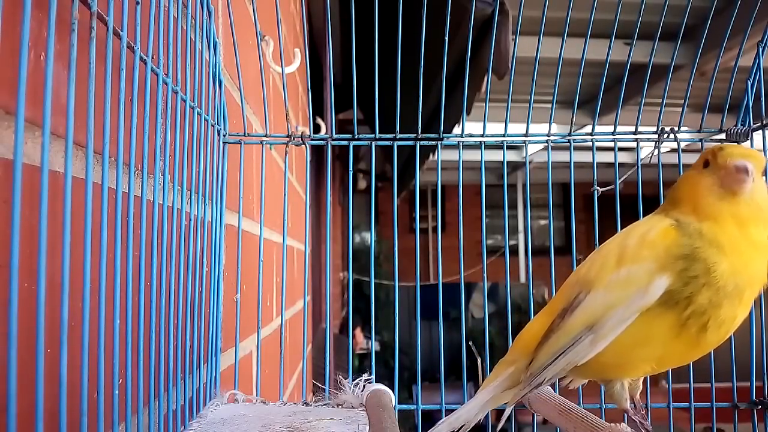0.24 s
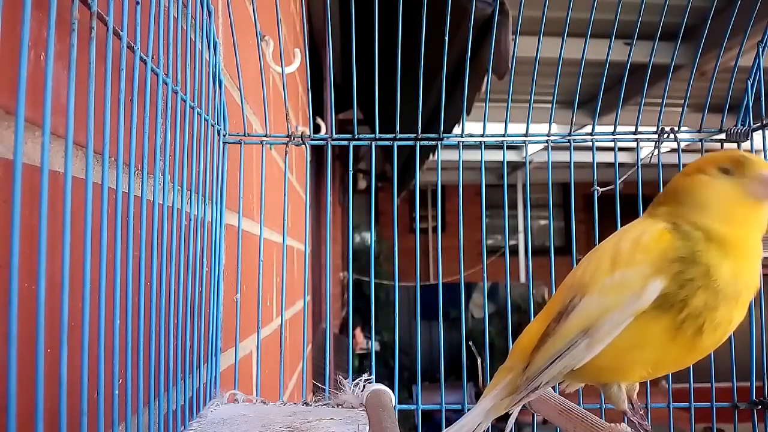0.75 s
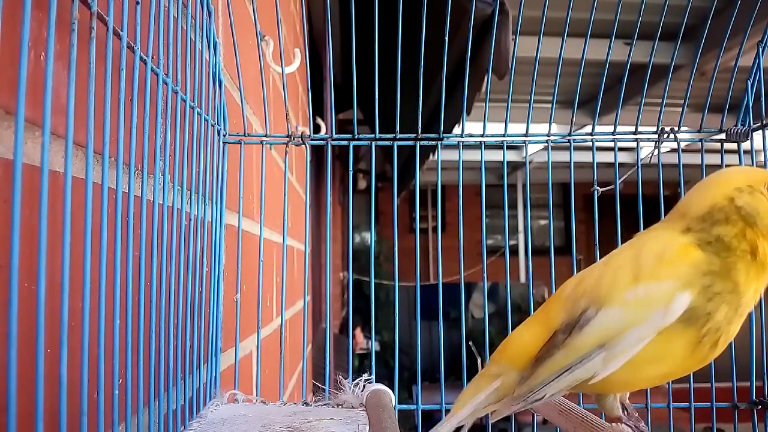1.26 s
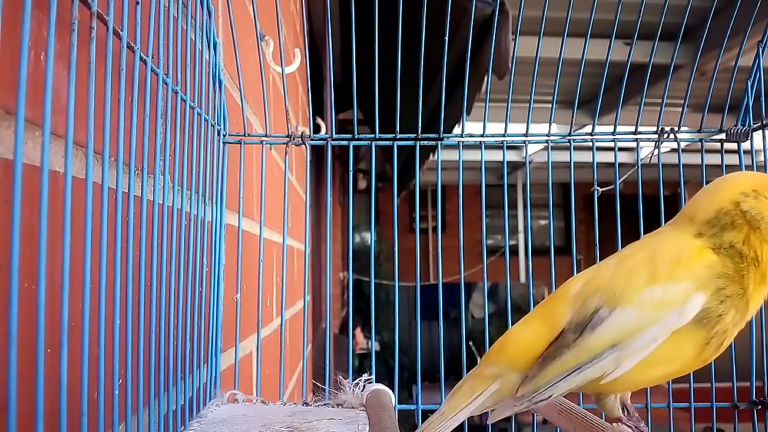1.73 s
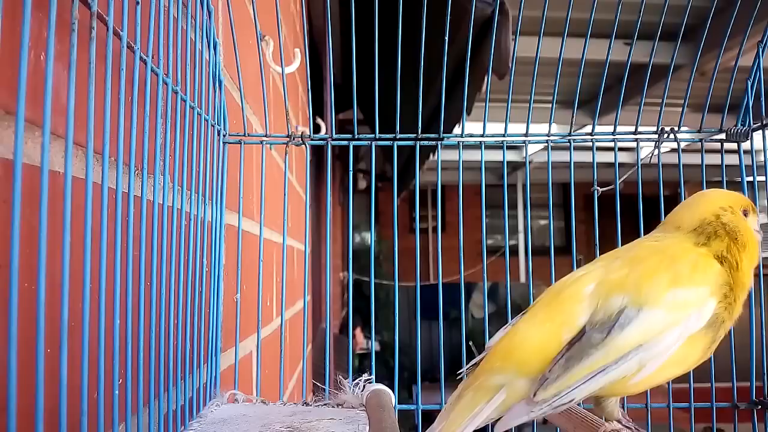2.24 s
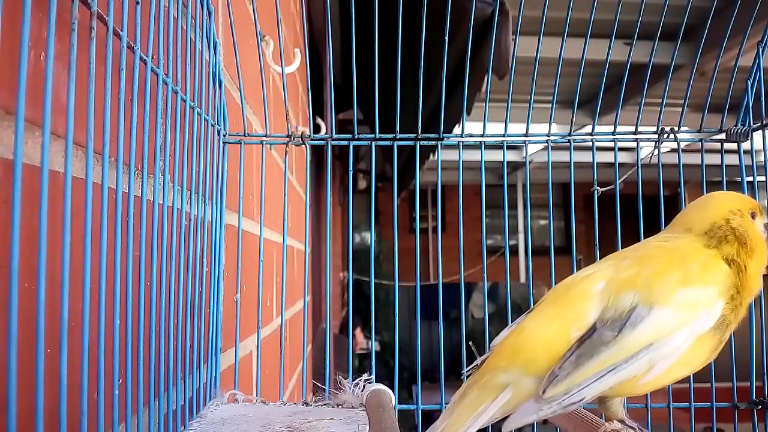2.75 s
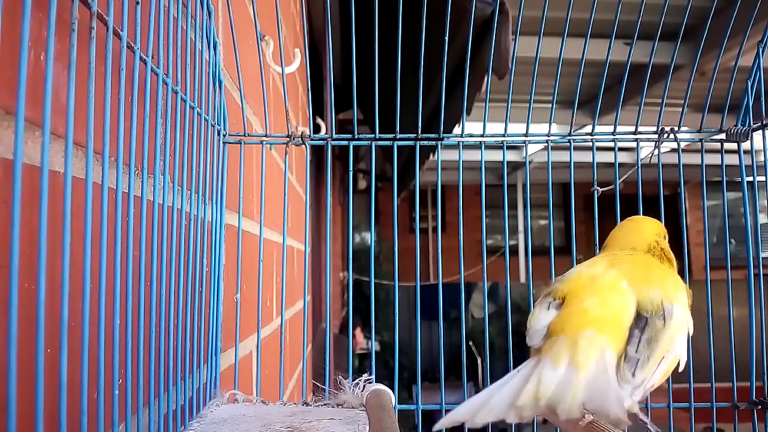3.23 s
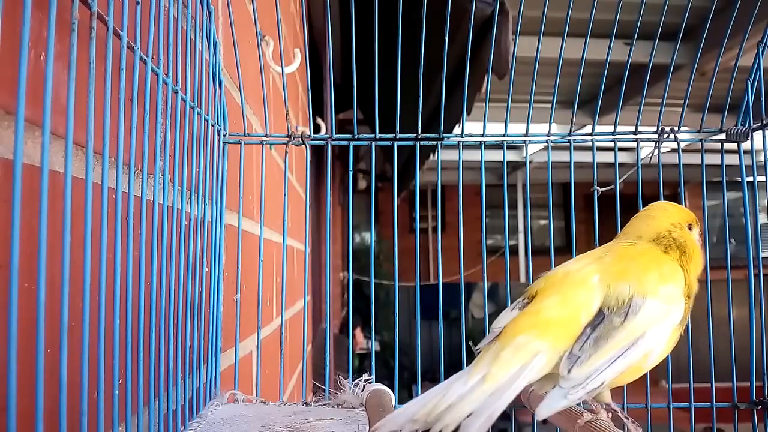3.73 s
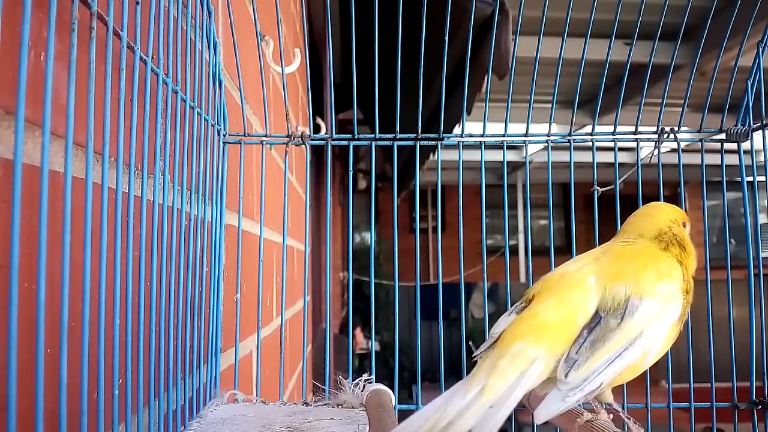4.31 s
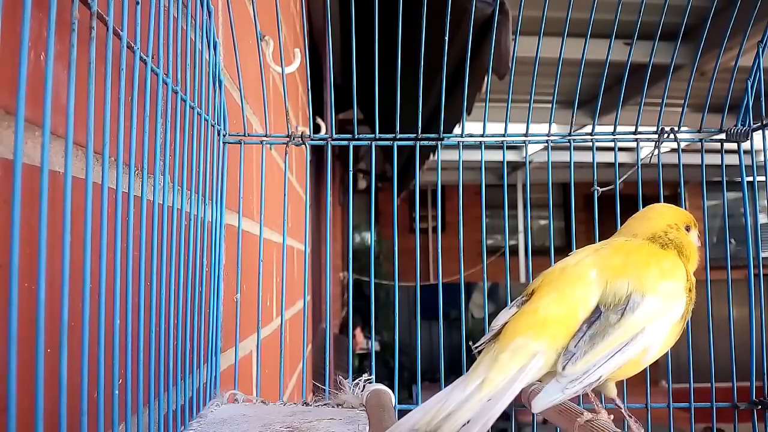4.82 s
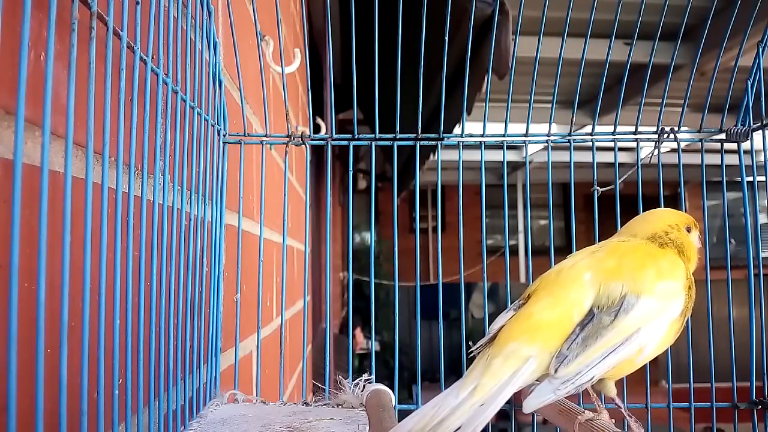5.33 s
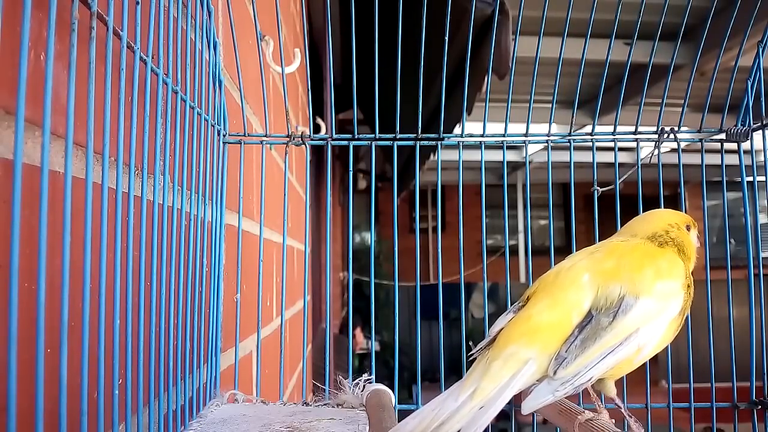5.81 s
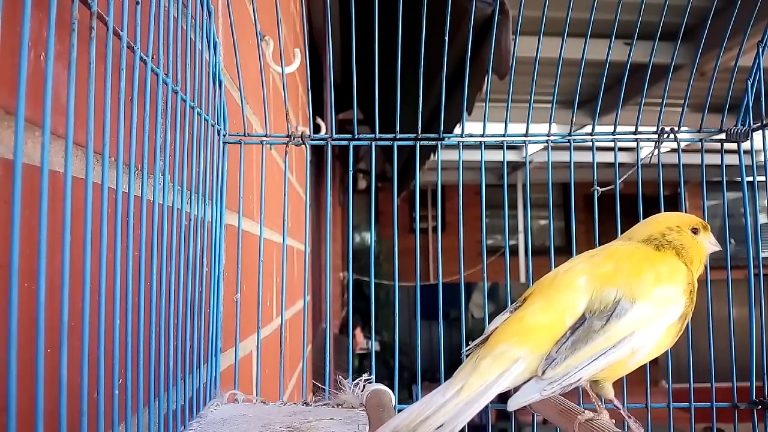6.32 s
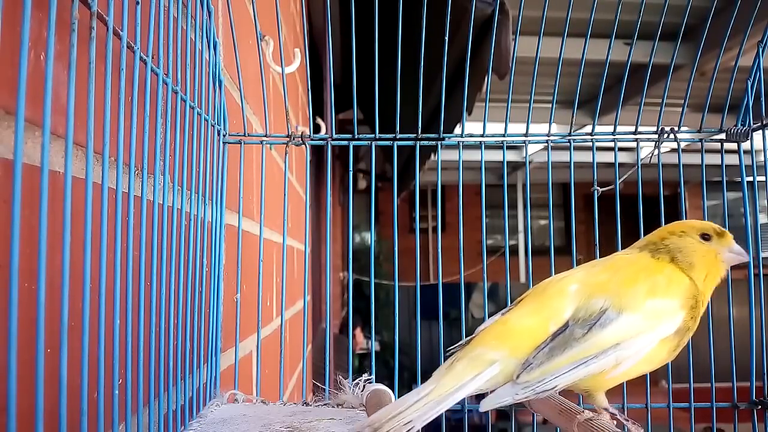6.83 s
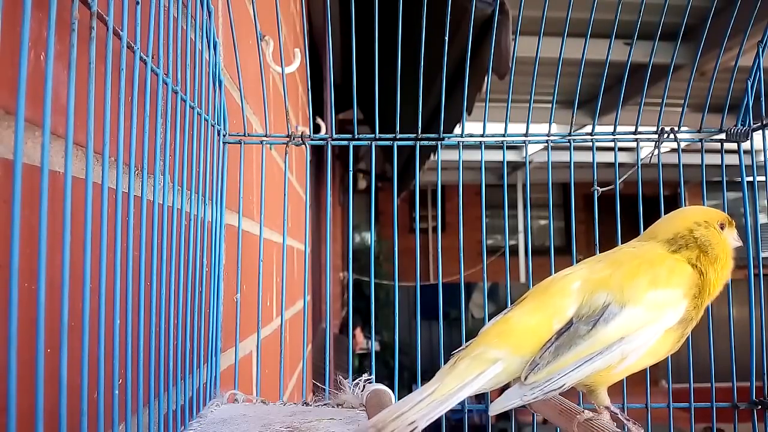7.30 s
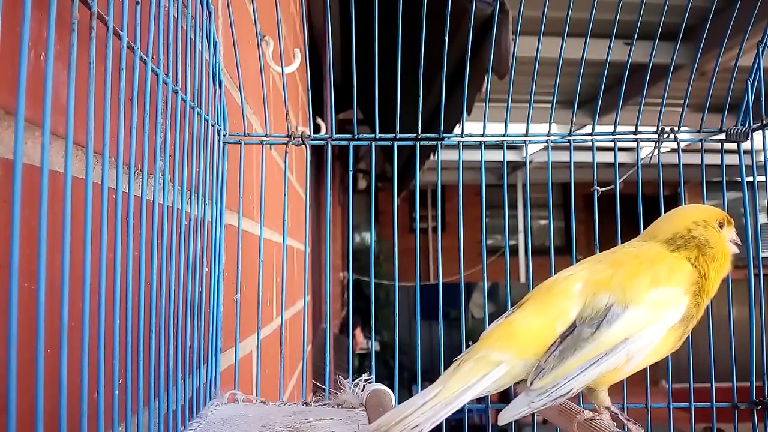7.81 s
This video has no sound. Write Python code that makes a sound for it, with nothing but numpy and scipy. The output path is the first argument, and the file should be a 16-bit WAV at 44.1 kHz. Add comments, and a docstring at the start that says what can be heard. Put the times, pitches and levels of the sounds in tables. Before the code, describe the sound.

Pure, high bird whistles in a reverberant hard-walled space: first distant rising slurs and soft falling notes, then closer upward sweeps with quick flicks overlapping them. A buzzing-fast trill of tiny rising chirps follows, gradually slower and fuller. After it stops, distant metal knocks clatter and ring over faint airy noise. A chip and two sweeping whistles restart the song near the end.

```python
"""In a live, hard-walled room, two canaries sing over a soft rush, a low rumble and a hiss, all made of noise.
The far bird gives rising slurs with two flicks, one falling drop, then a run of falling sighs.
The near bird cuts in with chips, upward sweeps with quick flicks, and a fast trill that slows and swells.
Each bird note is a gliding, nearly pure tone with weak overtones. Metal clanks some way off, mostly in
the pause after the trill: bursts of noise and fading rings. Then the near bird starts again."""
import sys
import numpy as np
from scipy import signal
from scipy.fft import rfft, irfft, next_fast_len
from scipy.io import wavfile
from scipy.ndimage import uniform_filter1d

SR = 44100
rng = np.random.default_rng(int(sys.argv[2]) if len(sys.argv) > 2 else 0)


def pcm_store(signal):
    """Save signal as 16-bit PCM."""
    levels = np.round(np.clip(np.atleast_2d(signal), -1, 1) * 32767)
    wavfile.write(sys.argv[1], SR, levels.astype(np.int16).T)


N = 355137

# Colour of the background rush: (frequency [Hz], relative level [dB])
RUSH_COLOUR = [(20, -34), (55, -20), (100, -10), (200, -8.5), (430, -9.5), (650, 0.5), (900, 6),
               (1300, -1.5), (2500, -10), (4000, -11.5), (6000, -8), (7200, -20.5), (8500, -36.5),
               (15000, -42.5)]
# Loudness of the rush: (time [s], level [dB])
RUSH_LEVEL = [(0, -53.5), (1.2, -55.5), (2.4, -56.5), (3, -54), (3.6, -57), (4.8, -56.5), (5.55, -60),
              (6.3, -58), (7.2, -58.5), (8.05, -61.5)]
# Colour of the low rumble: (frequency [Hz], relative level [dB])
RUMBLE_COLOUR = [(25, -34), (60, -22), (100, -5.5), (170, -3), (330, -1.5), (600, -7), (1200, -44)]
# Loudness of the rumble, before its unevenness: (time [s], level [dB])
RUMBLE_LEVEL = [(0, -64.5), (1.0, -66.5), (1.7, -68.5), (1.95, -60), (2.4, -70.5), (2.9, -64), (4.0, -73),
                (5.5, -73), (7, -72.5), (8.05, -69)]
# Colour of the hiss: (frequency [Hz], relative level [dB])
HISS_COLOUR = [(600, -24), (1500, 1), (3000, 8), (6000, 7.5), (7500, -7.5), (9500, -22.5), (15000, -41.5)]
# Loudness of the hiss: (time [s], level [dB])
HISS_LEVEL = [(0, -48), (1, -53), (1.4, -54), (2.8, -52), (3.5, -54), (4.7, -67), (8.05, -68.5)]

# Knocks on metal, before the gains in clanks(); the ring level also sets the scrape:
# (time [s], clatter level [dB], ring level [dB])
KNOCKS = [(0.933, -52, -72), (2.546, -52.5, -69), (2.82, -45, -79.5), (4.967, -44, -39), (5.145, -49, -46),
          (5.702, -45, -64), (5.848, -48.5, -63), (5.958, -55, -79), (6.67, -57, -72), (6.722, -43, -47),
          (7.364, -45, -46.5), (7.812, -46, -54)]
# The metal's ringing tones: (frequency [Hz], relative level [dB], time to fade by 60 dB [s])
METAL_MODES = [(1728, -12, 0.46), (1900, -18, .4), (4215, 2.5, .33), (4250, 8, .12), (4400, -3, .27),
               (6600, -15.5, .34), (7799, -3.5, .26), (7790, -7.5, .49), (9496, -10, .19)]
# Colour of the clatter: (frequency [Hz], relative level [dB])
CLATTER_COLOUR = [(30, -43), (100, -18.5), (400, -11), (600, -1.5), (1000, -2), (1350, -6.5), (1900, 2),
                  (2700, -12.5), (4300, -10), (6500, -20.5), (9000, -45.5), (15000, -64.5)]
# Colour of the bright scrape of metal on metal: (frequency [Hz], relative level [dB])
SCRAPE_COLOUR = [(100, -47), (800, -21.5), (2500, -5.5), (4400, -0.5), (6200, -1.5), (8000, -17.5),
                 (9000, -24.5), (11000, -31.5), (15000, -49.5)]
# Light clinks of thin metal: (time [s], frequency [Hz], level [dB])
THIN_CLINKS = [(0.247, 6090, -31), (1.464, 6130, -39)]

# Nearest walls and roof: (echo delay [s], level [dB])
WALL_ECHOES = [(.0053, -19), (.0076, -23), (0.0116, -21.5), (0.0121, -24), (0.0185, -33.5), (.022, -32.5),
               (.031, -27.5)]
# How long the room rings on: (frequency [Hz], time to fade by 60 dB [s])
ROOM_FADE = [(300, 1), (1000, 0.58), (2500, 0.67), (4200, 0.51), (8000, 0.41), (15000, 0.64)]

# Shape of each kind of note: (share of its length [0 to 1], factor on the note's pitch, change of level [dB])
NOTE_SHAPES = { "sweep": [(0, .53, -30), (.08, .6, -11), (.17, .7, -7.5), (.28, .805, -8.5),
               (.45, .88, -8.5), (.6, .925, -4.5), (.76, .965, -1.5), (.9, .995, .5), (1, 1, -9.5)],
               "slur": [(0, .6, -24), (.12, .66, -17), (.22, .79, -6), (.34, .855, -2.5), (.5, .9, -6),
               (.66, .955, -4.5), (.82, 0.97, -.5), (1, 1.02, -5)], "flick": [(0, .855, -8),
               (.15, .89, -0.5), (.33, .915, 0), (.6, .98, -4.5), (.8, 1.015, -5), (1, 1.033, -15)],
               "rise": [(0, 0.49, -16), (.2, .78, -2), (.45, .87, -2.5), (.7, .94, -3), (1, 1.02, -8.5)],
               "sigh": [(0, 1.02, -15.5), (.17, .985, 3), (.4, .94, -2), (.65, .875, -4.5), (.85, .79, -3),
               (1, .72, -10)], "drop": [(0, 1, -13), (.28, .975, -6), (.55, .94, -6), (.71, .89, 2),
               (.86, .76, -1), (1, .6, -10)], "chip": [(0, 1.01, -26), (.14, 0.95, -9), (.35, 0.94, -11),
               (.5, .88, -5), (.63, .77, 1.5), (.8, 0.61, -17.5), (1, 0.61, -19)],
               "short chirp": [(0, .27, -24.5), (.12, .34, -26), (.24, .45, -30), (.4, .6, -9),
               (.56, .76, -8), (.68, .89, 0.5), (.78, .94, 2.5), (.88, .985, -3.5), (1, 1.06, -15)],
               "long chirp": [(0, .29, -26.5), (.13, .39, -30), (.22, .55, -20), (.32, .7, -5),
               (.43, .81, -6.5), (.53, .885, -2.5), (.72, .96, 1.5), (.88, .995, -4), (1, 1.03, -19)], }
# Overtones of a loud note: (multiple of the pitch, level under the main tone [dB])
OVERTONE_LEVELS = [(2, -39), (3, -51), (4, -57)]
# The throat lets overtones through unevenly: (frequency [Hz], change of level [dB])
THROAT_COLOUR = [(2500, -3.5), (6000, 8), (7000, 4.5), (7700, -6.5), (8500, -6), (9500, 0.5), (10400, -6),
                 (11400, -1), (12200, -14), (13200, -12), (14200, -1)]

# Far syllables, a glide and two flicks: (time of first flick [s], glide length [s], pitch [Hz], level [dB])
FAR_GLIDES = [(.023, 0.1, 3970, -20), (.366, 0.11, 4100, -17), (.725, .116, 4090, -15.5)]
# Their flicks: (time after the first [s], length [s], factor on the glide's pitch, level over the glide [dB])
FAR_FLICK_PAIR = [(0, .028, 1.21, 2.5), (.063, .019, 1.14, 3)]
# The far bird's falling sighs: (time [s], length [s], level [dB])
FAR_SIGHS = [(1.402, 0.076, -18.5), (1.565, 0.077, -17), (1.729, 0.076, -15.5), (1.897, 0.069, -14),
             (2.06, .064, -15), (2.214, .057, -13), (2.371, .052, -13.5), (2.523, 0.059, -12.5),
             (2.666, .064, -13.5)]
# Colour of the lisp before a sigh: (frequency [Hz], relative level [dB])
LISP_COLOUR = [(2500, -44.5), (4300, 1.5), (5700, -1.5), (6500, -24.5), (9000, -58.5)]
# Near syllables: (time of flick [s], glide length [s], pitch [Hz], level [dB],
# straight path [dB], flick over the glide [dB], pitch of closing rise [Hz])
NEAR_GLIDES = [(1.989, 0.09, 4120, -19, 0.5, 5.5, 5250), (2.359, .103, 4170, -16.5, 2, 4, 5150),
               (2.766, .103, 4150, -16.5, 2.5, 4, 5160), (7.615, .101, 4110, -18.5, 3, 7, 4870),
               (7.979, .111, 4080, -19, 4, 6, 4940)]
# A sharp chip before each near phrase: (time [s], length [s], pitch [Hz], level [dB], straight path [dB])
NEAR_CHIPS = [(1.673, .0226, 5550, -18.5, 0.5), (7.287, 0.027, 5270, -15, 2.5)]
# The trill slows overall: (time [s], time from one chirp to the next [s])
TRILL_BEAT = [(2.82, .03868), (2.95, .03829), (3.2, .03983), (3.7, .0397), (3.95, .04184), (4.05, .04168),
              (4.6, .0459)]
# Its chirps grow longer, lower and louder overall, before a little chance:
# (time [s], length [s], pitch [Hz], level [dB])
TRILL_CHIRPS = [(2.82, 0.016, 4490, -19), (2.97, 0.016, 4390, -14.5), (3.22, .017, 4410, -14.5),
                (3.38, 0.017, 4430, -16.5), (3.6, .018, 4390, -14), (3.9, 0.021, 4325, -12),
                (4.28, .023, 4186, -13), (4.58, 0.023, 4165, -13.5), (4.625, .026, 4060, -17)]

LEAD_S = .2  # room for a song already under way at time zero
FAR_OVERTONES_DB, NEAR_OVERTONES_DB = 0, -2.5
FAR_GAP_S, FAR_STRAIGHT_DB, FAR_FLICK_STRAIGHT_DB = .02, -12, -9
DROP_AT_S, DROP_S, DROP_HZ, DROP_DB = 1.091, .084, 4400, -17.5
SIGH_HZ, SIGH_STRAIGHT_DB = 3490, -9.5
LISP_LEAD_S, LISP_DB = .044, -36
NEAR_GAP_S = .021
FLICK_S, FLICK_RATIO, FLICK_STRAIGHT_DB = .023, 1.252, -4  # the flick jumps up and spreads more widely
RISE_AFTER_S, RISE_S, RISE_DB = .0575, .0235, 1  # the closing rise, timed from the flick
TRILL_START_S, TRILL_END_S = 2.8213, 4.64
CHIRP_PEAK = .69  # share of a chirp that comes before its beat
EDGE_HZ = 15700  # upper edge of the whole sound


def amp(db):
    """Turns decibels into a gain."""
    return 10 ** (np.asarray(db) / 20)


def evened(x):
    """Scales a sound to an average strength (rms) of 1."""
    return x / np.sqrt(np.mean(x ** 2) + 1e-20)


def read(points, hz):
    """Reads a table between its frequencies, spaced roughly as we hear pitch."""
    f, value = np.transpose(points)
    return np.interp(np.log(hz + 1), np.log(f + 1), value)


def curve(points):
    """Reads a table over time at every sample."""
    return np.interp(np.arange(N) / SR, *np.transpose(points))


def add(mix, s, sound):
    """Mixes a sound in at time s."""
    part = mix[round(s * SR):][:len(sound)]
    part += sound[:len(part)]


def noise(colour, size):
    """Noise of a given colour, with an rms of 1."""
    spectrum = rfft(rng.standard_normal(size))
    gain = amp(read(colour, np.fft.rfftfreq(size, 1 / SR)))
    return evened(irfft(spectrum * gain, size))


def wander(rate_hz, size):
    """Smooth random drift, mostly slower than rate_hz, with an rms of about 1."""
    span = next_fast_len(max(size, SR // 10))
    hz = np.fft.rfftfreq(span, 1 / SR)
    slow = rfft(rng.standard_normal(span)) * np.exp(-(hz / rate_hz) ** 2)
    return evened(irfft(slow, span))[:size]


def patchy(x, patchy_db=2.0):
    """Lets a steady noise swell and sink in small patches of time and frequency."""
    z = signal.stft(x, SR, nperseg=1024)[2]
    patches = uniform_filter1d(rng.standard_normal(z.shape), size=7, axis=0)
    patches = uniform_filter1d(patches, size=7, axis=1)
    return signal.istft(z * amp(patchy_db * evened(patches)), SR, nperseg=1024)[1][:N]


def background(lumps_db=1.5, lumps_hz=7):
    """A soft rush, an uneven low rumble and a hiss that dies away."""
    rush = noise(RUSH_COLOUR, N) * amp(curve(RUSH_LEVEL))
    rumble = noise(RUMBLE_COLOUR, N) * amp(curve(RUMBLE_LEVEL) + lumps_db * wander(lumps_hz, N))
    hiss = noise(HISS_COLOUR, N) * amp(curve(HISS_LEVEL))
    return patchy(rush + rumble + hiss)


def first_echoes(x):
    """Single returns from the nearest walls and the roof."""
    out = np.zeros(len(x))
    for delay, db in WALL_ECHOES:
        add(out, delay, amp(db) * x)
    return out


def room(x, build_s=0.0031):
    """Many blended echoes, of total energy 1, where each band of pitch dies at its own speed."""
    hz, t, z = signal.stft(rng.standard_normal(SR), SR, nperseg=256)
    fade = amp(-60 * t / read(ROOM_FADE, hz)[:, None])
    tail = signal.istft(z * fade, SR, nperseg=256)[1]
    tail *= 1 - np.exp(-(np.arange(len(tail)) / SR / build_s) ** 2)
    return signal.fftconvolve(x, tail / np.linalg.norm(tail))[:len(x)]


def near_surface(x, dip_hz, width_hz, depth):
    """A surface close by weakens one narrow band of the straight sound; glides blink as they cross it."""
    notched = signal.lfilter(*signal.iirnotch(dip_hz, dip_hz / width_hz, SR), x)
    return x + np.clip(depth, 0, 1) * (notched - x)


def clanks(clatter_t60=0.13, scrape_t60=0.32, clink_t60=0.35, settle_s=0.006, clatter_gain_db=12.0,
           scrape_gain_db=6, spread_hz=60, steady=.7, beating=.6, rattle_db=3, rattle_hz=45):
    """Each knock is a brief, rattling clatter and a scrape that set the metal's modes ringing."""
    out, t = np.zeros(N), np.arange(SR) / SR
    attack = 1 - np.exp(-t / settle_s)
    for s, clatter_db, ring_db in KNOCKS:
        ring = np.zeros(SR)
        for hz, db, t60 in METAL_MODES:
            # every mode is a knot of close modes that beat against each other
            beat = steady + beating * wander(spread_hz, SR)
            ring += amp(db - 60 * t / t60) * beat * np.sin(2 * np.pi * hz * t)
        scrape = noise(SCRAPE_COLOUR, SR) * amp(scrape_gain_db - 60 * t / scrape_t60)
        rattle = rattle_db * wander(rattle_hz, SR)
        clatter = noise(CLATTER_COLOUR, SR) * amp(clatter_gain_db - 60 * t / clatter_t60 + rattle)
        add(out, s, attack * (amp(clatter_db) * clatter + amp(ring_db) * (ring + scrape)))
    for s, hz, db in THIN_CLINKS:
        clink = wander(2 * spread_hz, SR) * np.sin(2 * np.pi * hz * t)
        add(out, s, attack * amp(db - 60 * t / clink_t60) * clink)
    return out


def gesture(name, length):
    """Pitch factor and level change of one note, rounded off by the inertia of the muscles."""
    share, *columns = np.transpose(NOTE_SHAPES[name])
    u = np.linspace(0, 1, int(length * SR))
    return np.array([uniform_filter1d(np.interp(u, share, c), size=90, mode="nearest") for c in columns])


def whistle(hz, level_db, overtones_db=0, waver=0.0058, flutter_db=1.04, overtone_flutter_db=3.5,
            loud_db=-13, growth=.3, edge_s=.0017):
    """One side of the voice organ (syrinx): a nearly pure tone; its weak, unsteady overtones grow with effort."""
    size = len(hz)
    phase = 2 * np.pi * np.cumsum(hz * (1 + waver * wander(250, size))) / SR
    tone = np.sin(phase)
    effort_db = growth * (level_db - loud_db)
    for k, db in OVERTONE_LEVELS:
        k = round(k)
        flutter = overtone_flutter_db * wander(300, size)
        db = db + overtones_db + read(THROAT_COLOUR, k * hz) + effort_db + flutter
        # leave out any overtone too high for the sample rate
        tone += amp(db) * np.sin(k * phase + wander(300, size)) * (k * hz < SR / 2)
    from_end = np.minimum(np.arange(size), np.arange(size)[::-1]) / SR
    fade = np.sin(np.pi / 2 * np.minimum(from_end / edge_s, 1)) ** 2
    return np.sqrt(2) * tone * fade * amp(level_db + flutter_db * wander(150, size))


def note(name, length, hz, db, overtones_db):
    """One whistled note that follows its gesture."""
    bend, swell_db = gesture(name, length)
    return whistle(hz * bend, db + swell_db, overtones_db)


def lisps(length=0.015):
    """Short, faint puffs of air through the far bird's open beak, one before each sigh."""
    out, size = np.zeros(N), int(length * SR)
    for s, _, _ in FAR_SIGHS:
        puff = noise(LISP_COLOUR, size) * np.hanning(size)
        add(out, s - LISP_LEAD_S, amp(LISP_DB) * puff)
    return out


def far_notes():
    """Three syllables, a drop, then sighs: (time, gesture, length, pitch, level, straight path [dB])."""
    for flick_at, length, hz, db in FAR_GLIDES:
        yield flick_at - FAR_GAP_S - length, "slur", length, hz, db, FAR_STRAIGHT_DB
        for after, flick_s, ratio, over_db in FAR_FLICK_PAIR:
            yield flick_at + after, "flick", flick_s, hz * ratio, db + over_db, FAR_FLICK_STRAIGHT_DB
    yield DROP_AT_S, "drop", DROP_S, DROP_HZ, DROP_DB, SIGH_STRAIGHT_DB
    for s, length, db in FAR_SIGHS:
        yield s, "sigh", length, SIGH_HZ, db, SIGH_STRAIGHT_DB


def near_notes():
    """Chips, and syllables of sweep, flick and rise, in the same form; the trill replaces one rise."""
    for s, length, hz, db, straight_db in NEAR_CHIPS:
        yield s, "chip", length, hz, db, straight_db
    for flick_at, length, hz, db, straight_db, flick_db, rise_hz in NEAR_GLIDES:
        rise_at = flick_at + RISE_AFTER_S
        yield flick_at - NEAR_GAP_S - length, "sweep", length, hz, db, straight_db
        yield flick_at, "flick", FLICK_S, hz * FLICK_RATIO, db + flick_db, straight_db + FLICK_STRAIGHT_DB
        if not TRILL_START_S < rise_at + RISE_S < TRILL_END_S:
            yield rise_at, "rise", RISE_S, rise_hz, db + RISE_DB, straight_db


def song():
    """Both birds' notes but the trill, as they go out into the room (around) and straight ahead."""
    around, ahead = np.zeros((2, N + round(LEAD_S * SR)))
    for notes, overtones_db in (far_notes(), FAR_OVERTONES_DB), (near_notes(), NEAR_OVERTONES_DB):
        for s, name, length, hz, db, straight_db in notes:
            sound = note(name, length, hz, db, overtones_db)
            add(around, LEAD_S + s, sound)
            add(ahead, LEAD_S + s, sound * amp(straight_db))
    return around, ahead


def trill(short_s=.017, long_s=.0235, pitch_scatter=.01, scatter_db=.8, short_overtones_db=-4,
          long_overtones_db=1.5):
    """One upward chirp per beat; longer chirps level off more at the top and have richer overtones."""
    out, s = np.zeros(N), TRILL_START_S
    times, *controls = np.transpose(TRILL_CHIRPS)
    while s < TRILL_END_S:
        length, hz, db = (np.interp(s, times, c) for c in controls)
        # 0 for a short chirp, 1 for a long one
        slow = np.clip((length - short_s) / (long_s - short_s), 0, 1)
        bend, swell_db = (1 - slow) * gesture("short chirp", length) + slow * gesture("long chirp", length)
        overtones_db = (1 - slow) * short_overtones_db + slow * long_overtones_db
        sharp, loud = rng.standard_normal(2)
        pitch = hz * bend * (1 + pitch_scatter * sharp)
        chirp = whistle(pitch, db + swell_db + scatter_db * loud, overtones_db)
        add(out, s - CHIRP_PEAK * length, chirp)
        s += np.interp(s, *np.transpose(TRILL_BEAT))
    return out


def scene(room_db=-8.0, echo_db=0.0, trill_room_db=-11.7, trill_echo_db=3, far_straight_db=-13, far_room_db=-2):
    """The near bird shifts on its perch for the trill; the clanks arrive mostly by way of the room."""
    around, ahead = song()
    chirps, knocks = trill() + lisps(), clanks()
    sung = near_surface(ahead, dip_hz=3270, width_hz=240, depth=0.52)
    sung += first_echoes(amp(echo_db) * around) + room(amp(room_db) * around)
    trilled = near_surface(chirps, dip_hz=3350, width_hz=500, depth=.95)
    trilled += first_echoes(amp(trill_echo_db) * chirps) + room(amp(trill_room_db) * chirps)
    metal = amp(far_straight_db) * knocks + room(amp(far_room_db) * knocks)
    # cut off the lead before time zero
    return (sung[-N:] + trilled + metal + background())[None]


def record(dry):
    """The recorder's band limit: a steep filter takes away what lies above EDGE_HZ."""
    low_pass = signal.firwin(511, EDGE_HZ, window=("kaiser", 9), fs=SR)
    return signal.oaconvolve(dry, low_pass[None], "same")


dry = scene()
out = record(dry)
pcm_store(out)
```